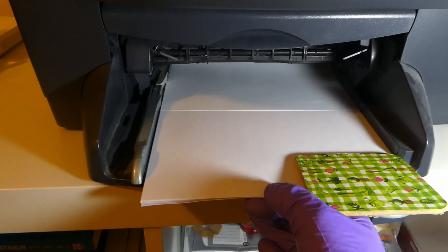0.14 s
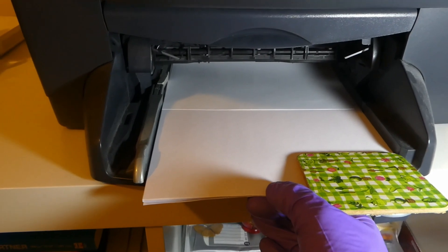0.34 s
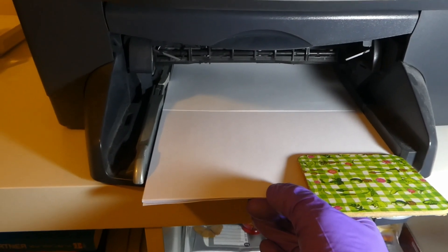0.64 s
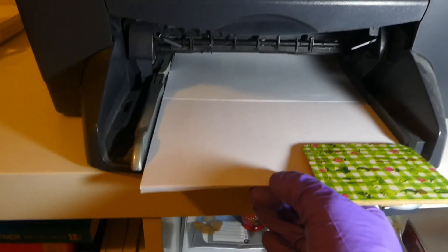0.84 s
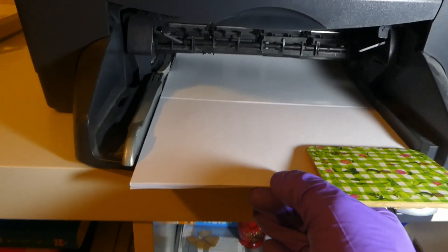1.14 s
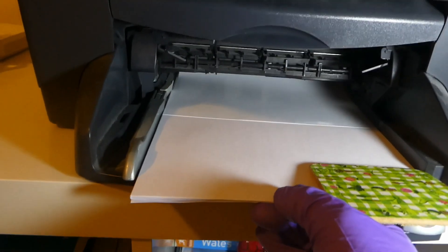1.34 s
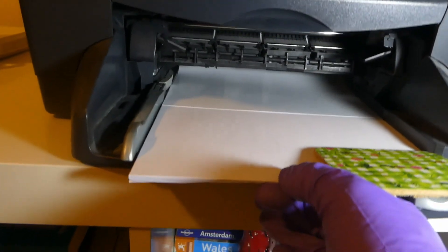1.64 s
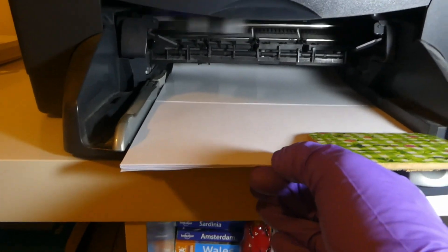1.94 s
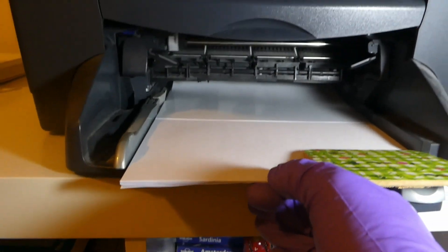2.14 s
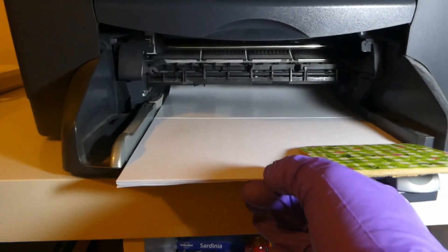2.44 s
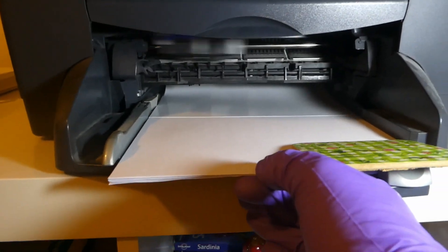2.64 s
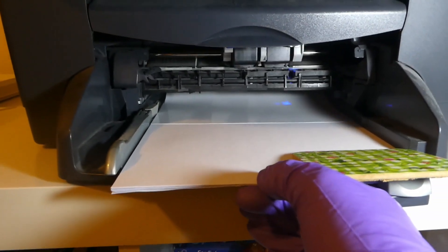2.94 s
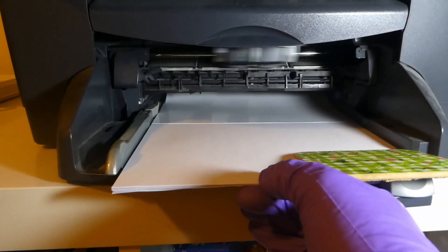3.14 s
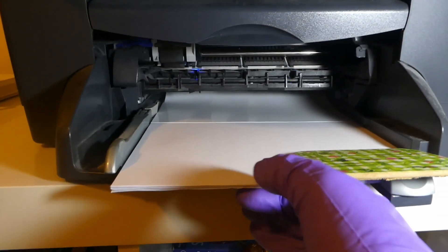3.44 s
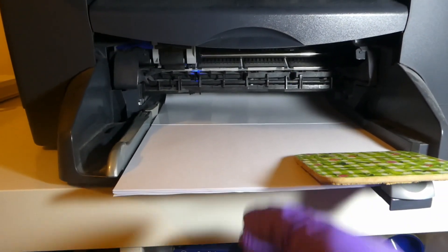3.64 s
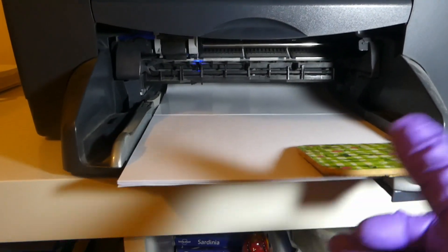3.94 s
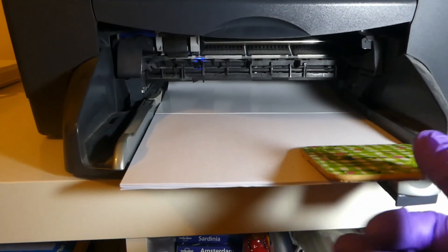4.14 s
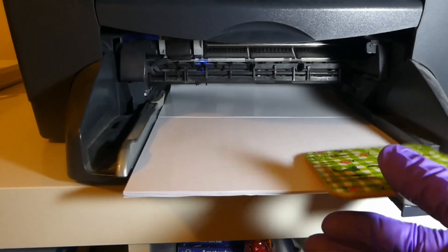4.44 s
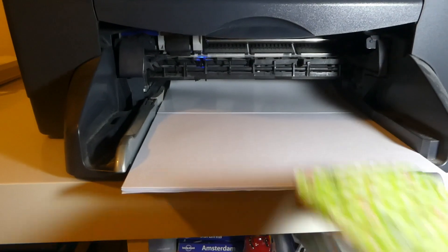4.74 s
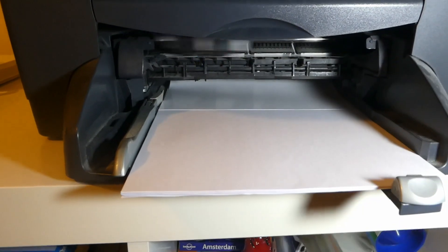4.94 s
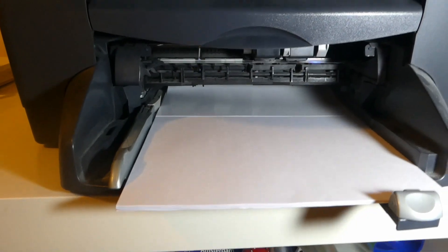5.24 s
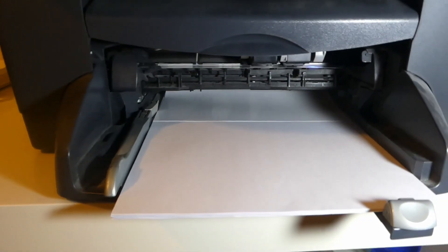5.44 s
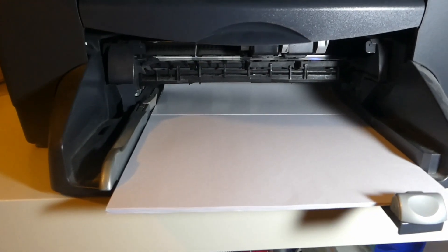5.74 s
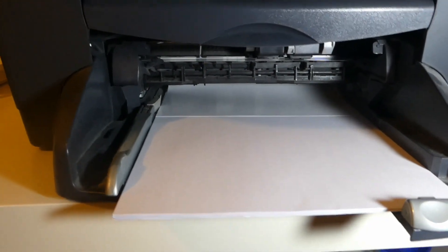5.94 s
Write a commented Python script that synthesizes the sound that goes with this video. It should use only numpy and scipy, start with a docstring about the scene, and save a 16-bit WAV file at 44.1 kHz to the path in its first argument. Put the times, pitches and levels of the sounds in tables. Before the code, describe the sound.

Close up in a small room, an inkjet printer feeds paper with a gear whir, a roller hiss and snapping latches. The print head then slides along its rail, clicks, slams loudly into its stops and makes several quick, whining passes. After a pause with only faint electronic hiss come soft knocks, a rattle and another brief pass. Four sharp snaps ring a thin plastic flap on the right as the head starts again.

```python
"""Inkjet printer in a small room.

The paper feed whirs through its gears, forward then in reverse; latches and cams snap.
The belt-driven print head runs along its rail and slams into its stops; loose parts chatter.
The plastic case rings with all of it, a thin flap with the last blows.
The electronics idle with a faint hiss and whine."""
import sys
import numpy as np
from scipy import signal
from scipy.fft import rfft, irfft, next_fast_len
from scipy.io import wavfile
from scipy.ndimage import map_coordinates

SR = 44100
rng = np.random.default_rng(int(sys.argv[2]) if len(sys.argv) > 2 else 0)


def inscribe(sig):
    """Save sig as 16-bit PCM at rate SR to the path in sys.argv[1].

    A 1-D sig is mono; a 2-D sig holds one channel per row.
    Samples are clipped to [-1, 1] before scaling.
    """
    pcm = np.round(np.clip(np.atleast_2d(sig).T, -1, 1) * 32767)
    wavfile.write(sys.argv[1], SR, pcm.astype(np.int16))


N = 268569
TIME_S = np.arange(N) / SR
TICK_S = np.arange(0, N / SR + .002, .001)  # control grid


def amp(db):
    """Decibels to gain."""
    return 10 ** (np.asarray(db) / 20)


def unit(x):
    """Scale to rms 1."""
    return x / np.sqrt(np.mean(x ** 2) + 1e-20)


def along(points, hz):
    """Interpolate (f/Hz, value) points on a log axis."""
    f, values = np.transpose(points)
    return np.interp(np.log(hz + 1), np.log(f + 1), values)


def per_sample(curve):
    """Control grid to audio rate."""
    return np.interp(TIME_S, TICK_S, curve)


def filtered(x, response):
    """Apply a complex frequency response."""
    size = next_fast_len(N + SR // 2)
    return irfft(rfft(x, size) * response(np.fft.rfftfreq(size, 1 / SR)), size)[..., :N]


def modes(table):
    """Response of (f/Hz, width/Hz, level/dB) resonances, alternating in sign."""
    return lambda f: sum((-1) ** k * amp(db) * 1j * f * width / (hz * hz - f * f + 1j * f * width)
                         for k, (hz, width, db) in enumerate(table))


def min_phase(points):
    """Minimum-phase response through (f/Hz, level/dB) points."""
    def response(f):
        cepstrum = irfft(np.log(amp(along(points, f)) + 1e-6))
        half = len(cepstrum) // 2
        cepstrum[1:half] *= 2
        cepstrum[half + 1:] = 0
        return np.exp(rfft(cepstrum))
    return response


def normed(response):
    """Scale a response to pass white noise at unchanged rms."""
    return lambda f: (gain := response(f)) / np.sqrt(np.mean(np.abs(gain) ** 2))


def wobble(rate_hz):
    """Smooth random curve with knots at rate_hz."""
    return map_coordinates(rng.standard_normal(int(N * rate_hz / SR) + 4), [TIME_S * rate_hz])


def gritty(grit_db, rate_hz):
    """Noise of rms 1 whose strength jumps as rubbing surfaces catch."""
    return unit(rng.standard_normal(N) * amp(grit_db * wobble(rate_hz)))


def contacts(size, grit_db):
    """Four rows of noise sharing sudden changes of strength."""
    noise = rng.standard_normal((4, size))
    return noise * amp(grit_db * rng.standard_normal(size // 16 + 1).repeat(16)[:size])


def run_up(start_s, length_s, rise_s, fall_s):
    """Control curve: rise toward 1, hold, coast down."""
    rise = 1 - np.exp(-np.maximum(TICK_S - start_s, 0) / rise_s)
    return rise * np.exp(-(np.maximum(TICK_S - start_s - length_s, 0) / fall_s) ** 2)


# room decay: f/Hz, t60/s
ROOM_DECAY = [(150, 0.46), (500, 0.31), (1200, 0.24), (3000, 0.14), (8000, 0.15), (15000, 0.051)]
def room_tail(t60_scale):
    """Room echo of energy 1; each frequency dies at its own rate."""
    hz, t, spectrum = signal.stft(rng.standard_normal(SR // 3), SR, nperseg=256)
    t60_s = t60_scale * along(ROOM_DECAY, hz)[:, None]
    echo = signal.istft(spectrum * amp(-60 * t / t60_s), SR, nperseg=256)[1]
    return echo / np.linalg.norm(echo)


# room and electronics noise, mid and side: f/Hz, relative level/dB
AIR_MID = [(15, -69), (25, -31), (108, -17.5), (190, -8.5), (217, -5.5), (394, -8), (439, -3), (545, -10.5),
           (962, -10), (1480, -15.5), (1890, -13), (3340, -16), (4140, -16.5), (13600, -22), (16000, -32)]
AIR_SIDE = [(15, -72), (25, -36), (108, -2.5), (301, 6), (427, 5), (1520, -8.5), (3430, -14.5), (5430, -48),
            (6560, -59), (12900, -49), (16000, -75)]
# electronic whines: f/Hz, width/Hz, level/dB
WHINES = [(988, 30, -79), (1866, 94, -73), (3372, 73, -68.5), (3950, 42, -78.5), (4730, 48, -76),
          (13240, 25, -102)]
# hum under load: t/s, length/s, level/dB
HUMS = [(.82, 0.18, -75), (1.805, 0.068, -63), (2.75, 0.48, -74.5)]
def idle():
    """Room air and hiss; the power electronics whine faintly, and the motor hums under load."""
    air = lambda points: unit(filtered(rng.standard_normal(N), lambda hz: amp(along(points, hz))))
    mid = amp(-59.5 + .45 * wobble(3.37)) * air(AIR_MID)
    side = amp(-53 + .73 * wobble(3.78)) * air(AIR_SIDE)
    peaks = lambda f: sum(amp(db) * normed(modes([(hz, width, 0)]))(f) for hz, width, db in WHINES)
    whine = filtered(rng.standard_normal(N), peaks)
    load = sum(amp(db) * run_up(start, length, rise_s=.03, fall_s=.05) for start, length, db in HUMS)
    hum = per_sample(load) * amp(wobble(17)) * np.sin(2 * np.pi * 100 * TIME_S)
    return mid + whine * amp(.38 * wobble(3.7)) + hum + np.array([side, -side])


# plastic case and gear train resonances: f/Hz, width/Hz, relative level/dB
CASE_MODES = [(190.6, 13.6, -6.5), (133, 53, -21), (235.9, 20, -4), (294, 15.2, -2.5), (342.8, 13.2, -1),
              (404.5, 38, -7), (446.4, 21, -2.5), (521.6, 30.5, -4.5), (586, 64, -4), (651.4, 26.3, 1),
              (718, 105, -5.5), (837.4, 43, 1.5), (883, 82, -2.5), (1024, 70, -6), (1117, 45, -6.5)]
CASE_LOW = [mode for mode in CASE_MODES if mode[0] < 550]
CASE_HIGH = [mode for mode in CASE_MODES if mode[0] > 550]
GEARS_FORWARD = [(646, 58, -2.5), (753, 40, 3), (846, 43, 1), (1130, 150, -4), (1507, 57, -4),
                 (1774, 71, -1), (2310, 180, -12), (2590, 66, -7), (3000, 40, -11), (3240, 57, -10.5),
                 (3886, 70, -8.5), (5320, 100, -19), (6030, 86, -16.5), (9100, 430, -22.5),
                 (12800, 200, -28)]
GEARS_REVERSE = [(702, 150, -1), (1104, 57, 4), (1350, 43, -2), (1800, 200, -4), (2260, 99, -4),
                 (2770, 140, -6.5), (3150, 19, -7), (3710, 65, -9), (5360, 210, -29)]
# rollers on paper: f/Hz, relative level/dB
PAPER_HISS = [(2060, -32), (3500, -1.5), (3850, 3.5), (4210, -4.5), (5970, -4), (7510, -11.5), (11200, -13),
              (12600, -14), (16000, -45)]
# motor runs, forward then reverse: t/s, length/s, whir/dB, rumble/dB, hiss/dB
FEED_RUNS = [(-.1, 1.001, -45, -53.5, -54.5), (0.985, .22, -47, -55, -55)]
# gear mesh whine: t/s, length/s, level/dB
MESH_WHINES = [(-.1, 0.36, -52), (.83, .09, -54)]
def paper_feed(rise_s=.012, fall_s=.045, waver_db=.3, mesh_hz=1790):
    """Rough tooth contact rings the gears; motor and jolts shake the case; rollers hiss on paper."""
    gears, hiss = np.zeros(N), 0
    rumble = shudder([row[1] for row in JOLTS])
    for run, gear_modes in zip(FEED_RUNS, (GEARS_FORWARD, GEARS_REVERSE)):
        start, length, whir_db, rumble_db, hiss_db = run
        turning = run_up(start, length, rise_s, fall_s)
        load = amp(whir_db + waver_db * wobble(13.2)) * per_sample(turning)
        gears += filtered(load * gritty(grit_db=2, rate_hz=95), normed(modes(gear_modes)))
        rumble = np.hypot(rumble, amp(rumble_db) * turning)
        hiss += amp(hiss_db) * turning
    mesh = sum(amp(db) * run_up(start, length, rise_s, fall_s) for start, length, db in MESH_WHINES)
    whine = per_sample(mesh) * wobble(70) * np.sin(2 * np.pi * mesh_hz * TIME_S)
    case = filtered(gritty(grit_db=-1, rate_hz=50), normed(modes(CASE_LOW)))
    paper = filtered(gritty(grit_db=2.5, rate_hz=200), normed(min_phase(PAPER_HISS)))
    return gears + whine + per_sample(rumble) * case + per_sample(hiss) * paper


# jolts to the mechanism: t/s, case rumble/dB, rail scrape/dB
JOLTS = [(.15, -40, -66), (.305, -34.5, -58), (.765, -36, -56), (1.03, -40, -53), (1.75, -47, -49),
         (2.07, -38.5, -60), (2.21, -45.5, -57), (2.40, -34, -34.5), (2.511, -48, -33), (2.58, -27, -38),
         (2.82, -38, -50), (3.22, -43.5, -62), (3.33, -41, -64), (3.38, -43, -63), (4.55, -42, -68),
         (4.96, -38, -61), (5.753, -48, -36), (5.98, -56, -39), (6.045, -37, -58)]
def shudder(levels_db, rise_s=.008, t60_s=.35):
    """Gain curve of the mechanism shaking on after each jolt, summed in power."""
    age_s = np.maximum(TICK_S - np.array(JOLTS)[:, :1], 0)
    decays = amp(np.array(levels_db)[:, None] - 60 * age_s / t60_s)
    return np.linalg.norm(decays * (1 - np.exp(-age_s / rise_s)), axis=0)


# latch, cam and end-stop blows, before trims:
# t/s, crack/dB, crack f/Hz, thud/dB, knock/dB, treble/dB, pan/dB (+ left)
IMPACTS = [(.2887, -27.5, 3970, -50, -35, -23, -3.5), (.2981, -19.5, 2610, -43, -32, -54, -1),
           (.3193, -35, 1580, -36.5, -32, -58, 1), (.3456, -28, 2080, -39, -33, -37, -1),
           (.392, -32.5, 1500, -58, -44, -37, -1), (.6826, -30.5, 2260, -53, -52, -41, -1),
           (.7484, -30, 3380, -47, -41, -40, 8), (.7573, -20.5, 3440, -32, -21.5, -29, -3),
           (.7702, -23.5, 2560, -34, -34, -26, -10), (.7817, -26, 2260, -33.5, -32, -31, 10),
           (.816, -23, 1930, -38, -37, -28, -4.5), (1.0161, -22, 2104, -46, -39, -45, -2),
           (1.415, -60, 900, -62, -44.5, -65, 0), (1.4435, -51, 900, -57, -38.5, -56, 4),
           (1.5464, -53, 900, -60, -40.5, -57, 2), (1.5827, -26.5, 1610, -46, -29, -28, -1.5),
           (1.5931, -35, 1550, -37, -41, -64, 2), (1.6332, -33, 1650, -50, -40, -40, 0),
           (1.679, -25, 3300, -52, -30.5, -29, 0), (1.7094, -29, 1320, -41, -38, -55, 0),
           (1.7808, -35, 1640, -64, -48, -43, -1), (1.7985, -26, 1610, -33.5, -29.5, -34, 2),
           (1.8527, -33, 3070, -41.5, -37, -32, 1), (1.8991, -34, 2760, -46, -36, -36, -1),
           (2.0637, -29, 1630, -37, -37, -39, 0), (2.1492, -35, 2890, -43, -44, -42, 12),
           (2.2737, -39.5, 1440, -61, -39.5, -67, 0), (2.3632, -20, 3780, -23.5, -20, -15.5, 4),
           (2.373, -10, 2470, -21.5, -16, -17, 0), (2.3915, -18, 1340, -24, -23, -27, 0),
           (2.5176, -24, 1380, -37, -38, -43, -1), (2.5462, -14.5, 2450, -24.5, -15, -21, 2.5),
           (2.5605, -13, 1300, -19.5, -16, -13, 0.5), (2.5732, -20, 1300, -25, -20.5, -41, 1),
           (2.6248, -33, 2067, -42, -31, -33, 0), (2.9919, -43, 1710, -45.5, -54, -45, 1),
           (3.165, -58, 900, -56, -46, -70, 0), (3.2024, -32, 1610, -43.5, -40.5, -42, 4),
           (4.4154, -42.5, 3600, -53.5, -50, -41.5, -4), (4.5323, -31.5, 1460, -31.5, -35, -39.5, -7),
           (4.5406, -52, 2010, -35, -34, -64, 1), (4.7698, -43.5, 1490, -38.5, -40, -54, -2),
           (4.961, -33.5, 1700, -37, -38, -45, -1), (5.1246, -34, 1620, -34.5, -44, -38, -1),
           (5.7394, -16, 3770, -28, -23, -22, -13), (5.82, -33, 2170, -37.5, -38, -45, -5),
           (5.8995, -35, 2700, -41, -39, -43.5, -9), (5.9655, -14, 1900, -29, -23, -48, -11)]
def blows(thud_hz=393, knock_hz=816.5, spot_spread=.11):
    """Short bursts of contacts push small parts and case near pitches set by the spot they hit."""
    t = np.arange(SR // 10) / SR
    envelope = np.exp(-t / .0065) * (1 - np.exp(-t / .00037))
    push_decay_s = [[.005], [.0018], [.004]]  # crack, thud, knock
    spots_hz = np.exp(spot_spread * rng.standard_normal((len(IMPACTS), 2))) * [thud_hz, knock_hz]
    for impact, spot_hz in zip(IMPACTS, spots_hz):
        start, crack_db, crack_hz, thud_db, knock_db, treble_db, pan_db = impact
        burst = contacts(len(t), grit_db=2.5) * envelope
        pushes = np.sin(2 * np.pi * np.outer([crack_hz, *spot_hz], t)) * np.exp(-t / push_decay_s)
        burst[:3] = [[.9], [.45], [.45]] * burst[:3] + [[.27], [.3], [.22]] * pushes
        gains = amp([crack_db - 7, thud_db + 3.5, knock_db, treble_db - 4.5])
        yield start, gains[:, None] * burst, pan_db


# spectra of small parts and contact treble: f/Hz, relative level/dB
SMALL_PARTS = [(700, -27.5), (1300, 2.5), (1650, 5), (2200, 3.5), (3000, 4), (4000, -4), (6000, -17.5),
               (9000, -51.5)]
TREBLE = [(2060, -42), (3500, 2), (5160, 3.5), (6700, 3), (7850, 0.5), (11100, 1), (15600, -21.5),
          (16000, -4)]
def struck_parts(events):
    """Contacts ring small parts, low and high case modes and treble; each gets its own room echo."""
    drives = np.zeros((4, 3, N + SR))  # path, (left, right, echo), sample
    pan_share = [.43, .17, .6, .32]  # per path
    for start, burst, pan_db in events:
        sides = amp(np.outer(pan_share, [pan_db / 2, -pan_db / 2]))
        at = round(start * SR)
        drives[:, :2, at:at + burst.shape[1]] += sides[..., None] * burst[:, None]
        echo = signal.fftconvolve(burst, room_tail(t60_scale=.92)[None], axes=1)
        drives[:, 2, at + 130:at + 130 + echo.shape[1]] += echo
    desk = lambda f: amp(-16.5) / (1 + 1j * f / 90) ** 2  # the desk top gives under a blow
    thud = lambda f: modes(CASE_LOW)(f) + desk(f)
    paths = (min_phase(SMALL_PARTS), thud, modes(CASE_HIGH), min_phase(TREBLE))
    left, right, echo = sum(filtered(drive[:, :N], normed(path)) for drive, path in zip(drives, paths))
    return np.array([left, right]) + amp(-6.5) * echo


# carriage frame and steel rail resonances: f/Hz, width/Hz, relative level/dB
FRAME_MODES = [(176, 15, -18), (230, 99, -24.5), (347.7, 10.1, 4.5), (420, 55, -10), (477, 12, -1),
               (547, 32, -10)]
RAIL_MODES = [(4740, 1450, -3), (6300, 530, 0.5), (7250, 510, 5.5), (8900, 600, 4.5), (10640, 440, 4.5),
              (10870, 450, 1), (11500, 800, 8.5)]
# rail scrape and slow-travel hiss: f/Hz, relative level/dB
RAIL_SCRAPE = [(650, -19.5), (1100, -2), (1560, -6.5), (2100, -5), (2290, -6.5), (2840, -6.5), (4150, -12),
               (5500, -14), (7150, -30), (12100, -120)]
RAIL_HISS = [(2350, -28), (4000, -4.5), (6660, -3.5), (7790, -7.5), (9890, -1.5), (13800, -19),
             (15500, -21), (16000, -22)]
# head moves: t/s, time until braking/s, top speed/full speed, gain/dB
HEAD_MOVES = [(1.203, 0.47, 0.31, 1.4), (1.6, 0.22, 0.71, -1.5), (1.8, .26, 0.99, -0.2),
              (2.4, 0.15, 0.67, 7.5), (2.645, 0.13, .98, 0.5), (2.861, 0.22, 0.52, -4),
              (3.21, 0.097, 1.093, -1.9), (4.96, 0.14, .96, 0), (5.16, 0.058, 0.38, -2.5),
              (6.025, .2, 0.92, -1)]
def print_head(accel_s=.04, brake_s=.1, linger_s=.021, full_tooth_hz=498):
    """The belt drive shakes frame and case, the carriage rubs its rail, belt teeth sing at speed."""
    speeds = np.array([top * run_up(start, length, accel_s, brake_s)
                       for start, length, top, _ in HEAD_MOVES])
    speed = speeds.max(axis=0)
    gain = amp([row[3] for row in HEAD_MOVES])[speeds.argmax(axis=0)]
    by_speed = lambda db, power: gain * amp(db) * speed ** power
    pole = np.exp(-TICK_S[1] / linger_s)  # the frame hums on after a stop
    shake = per_sample(signal.lfilter([1 - pole], [1, -pole], by_speed(-37.5, power=2.92)))
    frame = filtered(shake * gritty(grit_db=.5, rate_hz=70), normed(modes(FRAME_MODES)))
    whir = per_sample(by_speed(-43.5, power=1.49))
    case = filtered(whir * gritty(grit_db=-1.5, rate_hz=120), normed(modes(CASE_HIGH)))
    rub = per_sample(np.hypot(by_speed(-49.5, power=.8), shudder([row[2] for row in JOLTS])))
    scrape = rub * filtered(gritty(grit_db=1.5, rate_hz=73), normed(min_phase(RAIL_SCRAPE)))
    rail = lambda f: modes(RAIL_MODES)(f) / (1 + (f / 13000) ** 12)
    ring = filtered(gritty(grit_db=3, rate_hz=160), normed(rail))
    ring *= per_sample(by_speed(-48.5, power=6.7))  # only a quick pass rings the rail
    hiss = filtered(gritty(grit_db=2.5, rate_hz=20), normed(min_phase(RAIL_HISS)))
    hiss *= per_sample(by_speed(-53, power=.75))
    tooth_hz = full_tooth_hz * per_sample(speed) * (1 + .0249 * wobble(120))
    phase = 2 * np.pi * np.cumsum(tooth_hz) / SR
    belt = amp(-4) * np.sin(phase) + np.sin(2 * phase) + amp(-22) * np.sin(4 * phase)
    belt *= per_sample(by_speed(-40.5, power=4.6)) * amp(3.3 * wobble(110))
    return frame + case + scrape + ring + hiss + belt


# loose parts: t/s, length/s, crack/dB, thud/dB, knock/dB, treble/dB
CHATTER = [(2.344, 0.022, -43.5, -44, -39, -44), (2.483, 0.038, -38, -57, -40, -43),
           (2.768, 0.034, -45, -45, -46, -46), (3.312, 0.022, -46.5, -54, -43, -54.5),
           (3.916, 0.036, -62, -80, -70, -58), (6.035, 0.024, -45.5, -37.5, -45, -52),
           (4.649, .04, -58, -59, -52.5, -75), (4.775, 0.033, -62, -44.5, -52, -73),
           (4.84, .09, -36.5, -40, -32.5, -35.5), (5.091, 0.021, -41.5, -47.5, -44, -41.5)]
def rattles():
    """Loose parts chatter in a swelling, fading run of contacts as the head starts, stops or couples."""
    for start, length, *levels_db in CHATTER:
        swell = np.sin(np.linspace(0, np.pi, round(length * SR))) ** .69
        yield start, amp(levels_db)[:, None] * contacts(len(swell), grit_db=3) * swell, 0


# flap resonances: f/Hz, relative level/dB, t60/s
FLAP_MODES = [(1110, 0, .22), (1260, -6, .1), (2000, -8, .1), (2800, -7, .1)]
# blows on the flap: t/s, level/dB
FLAP_HITS = [(5.742, -33), (5.822, -40), (5.901, -36), (5.967, -36)]
def flap():
    """A thin plastic flap on the right rings on after the last blows."""
    out, t = np.zeros(N + SR), np.arange(SR // 4) / SR
    attack = 1 - np.exp(-t / .002)
    for start, hit_db in FLAP_HITS:
        for hz, mode_db, t60_s in FLAP_MODES:
            decay = amp(hit_db + mode_db + rng.normal(0, 2.5) - 60 * t / t60_s)
            tone = np.sin(2 * np.pi * hz * (1 + rng.normal(0, .015)) * t)
            out[round(start * SR):][:len(t)] += attack * decay * tone
    return out[:N] * amp(2.5 * wobble(90)) * amp([[-3], [3]])


# side signal scattered off nearby surfaces: f/Hz, level/dB
SCATTER = [(60, -2), (130, -13), (290, -23.5), (640, -16.5), (1410, -13.5), (3100, -24), (6820, -60),
           (15000, -4)]
def scene(bass_hz=130):
    """The printer straight ahead, widened by scatter; its small case radiates little bass."""
    direct = paper_feed() * amp([[.3], [-.3]]) + print_head() + flap()
    direct += struck_parts([*blows(), *rattles()])
    echo = signal.fftconvolve(direct.mean(axis=0), room_tail(t60_scale=.42))[:N]
    side = filtered(echo, lambda hz: amp(along(SCATTER, hz)))
    radiation = lambda f: .11 + (1j * f / bass_hz) ** 2 / (1 + 1.4j * f / bass_hz - (f / bass_hz) ** 2)
    return filtered(direct + np.array([side, -side]), radiation) + idle()


def record(dry):
    """Brick-wall low-pass at 15.8 kHz."""
    return filtered(dry, lambda hz: hz < 15800)


dry = scene()
out = record(dry)
inscribe(out)
```